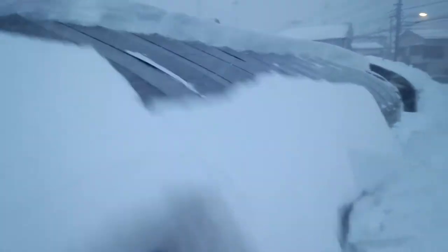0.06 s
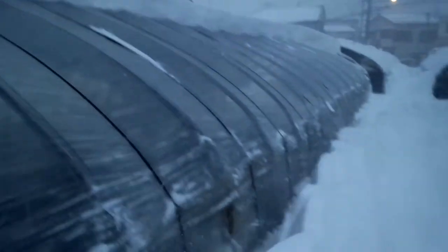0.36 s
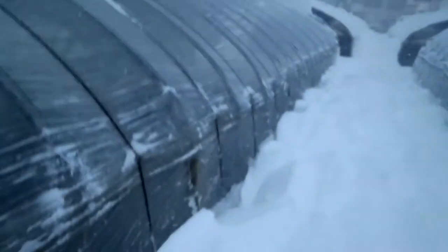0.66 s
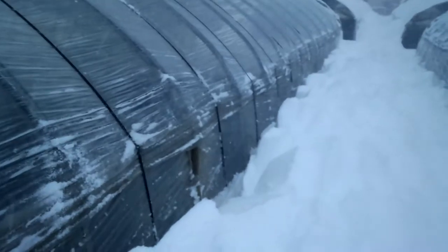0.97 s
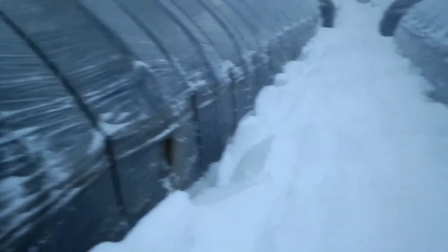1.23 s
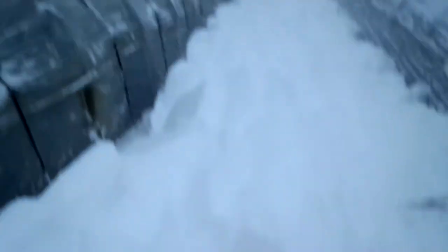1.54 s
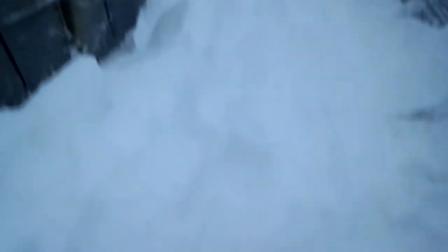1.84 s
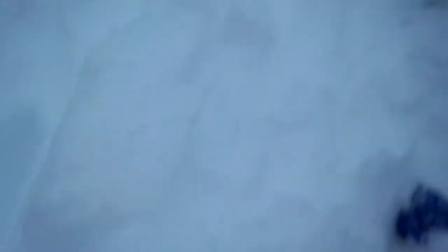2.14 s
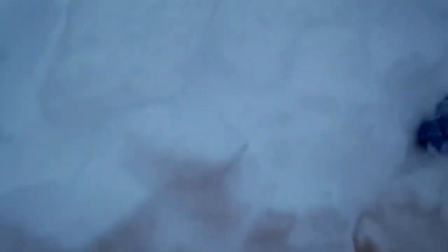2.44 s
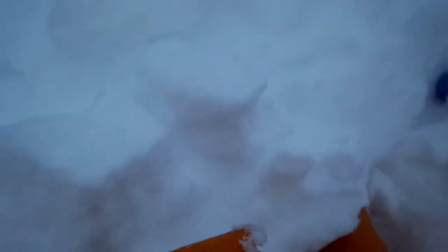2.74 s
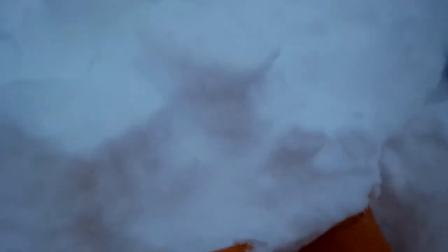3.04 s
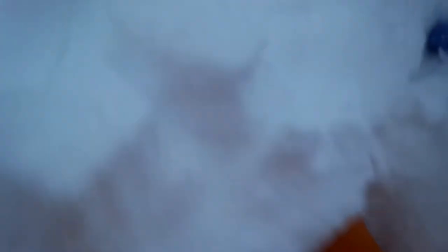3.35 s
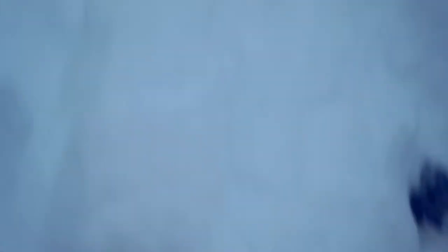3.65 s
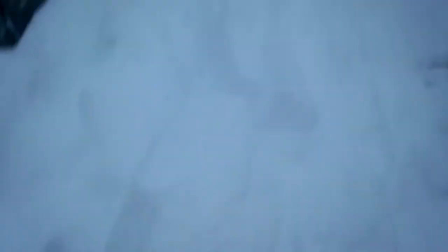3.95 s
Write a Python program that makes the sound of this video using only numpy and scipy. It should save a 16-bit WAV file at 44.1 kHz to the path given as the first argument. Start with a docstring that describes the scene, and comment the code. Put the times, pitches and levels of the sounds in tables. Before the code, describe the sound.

Snow slides off a plastic greenhouse roof right at the start, scraping as lumps tumble, and a powdery hiss fades by about 1 second. Wind thumps on the microphone, strongest from 1.1 to 1.5 seconds and again at 3.5. From 1.5 seconds, nearby snow rustles and crunches faintly, with muffled pats from around 2.5. Cloth swishes twice, at about 3.3 and 3.7 seconds.

```python
"""Snow sliding off a greenhouse

A slab of snow scrapes down a plastic sheet, lumps tumble, and loose powder hisses after it.
Gusts of wind thump on the microphone. Close by, snow rustles and crunches faintly, and cloth,
like a jacket, swishes twice. Sliding and rubbing snow is made of many tiny impacts,
crunches and pats are short knocks, and wind and cloth are shaped noise."""
import sys
import numpy as np
from scipy import signal
from scipy.fft import rfft, irfft, next_fast_len
from scipy.io import wavfile
from scipy.ndimage import uniform_filter1d, map_coordinates

SR = 44100
rng = np.random.default_rng(int(sys.argv[2]) if len(sys.argv) > 2 else 0)


def transcribe(u):
    """Save the signal u as a 16-bit wav file named by the first command-line argument.

    u: samples, shape (n,) or (channels, n), limited to [-1, 1]; the rate is SR.
    q: integer samples, one column per channel.
    """
    v = np.clip(np.atleast_2d(u).T, -1, 1)
    q = np.round(v * 32767).astype(np.int16)
    wavfile.write(sys.argv[1], SR, q)


N = 176400
T = np.arange(N) / SR

# A colour says how strong a sound is at each pitch. Its levels only count against each other.
# colour of the faint background hiss: pitch_hz, level_db
AIR_COLOUR = [(59, -39), (100, -8), (206, -14), (243, -5), (281, -21), (545, -13), (617, -21), (791, -52),
              (914, -43), (1630, -33), (2320, -46), (4310, -30), (7690, -31.5), (10900, -23), (14000, -34)]

# how the wind rises and falls: time_s, level_db
GUSTS = [(0.0, -36.5), (0.07, -38.5), (0.17, -37.5), (0.22, -36.5), (0.3, -25.5), (0.33, -38.5),
         (0.39, -34.5), (0.45, -32.5), (0.55, -46), (0.61, -47), (0.64, -53.5), (0.96, -41.5), (1.0, -47),
         (1.06, -35.5), (1.11, -41), (1.145, -28.5), (1.167, -23.5), (1.186, -37), (1.225, -21),
         (1.248, -29), (1.272, -24), (1.3, -25.5), (1.34, -35.5), (1.44, -44.5), (1.51, -24.5),
         (1.54, -34.5), (1.63, -46), (1.7, -51), (1.75, -37.5), (1.81, -30.5), (1.84, -39.5), (1.93, -50),
         (1.96, -33.5), (2.0, -41), (2.04, -45), (2.13, -40), (2.17, -53.5), (2.36, -52), (2.39, -42.5),
         (2.43, -55), (2.57, -52.5), (2.61, -42.5), (2.69, -53.5), (2.77, -41.5), (2.87, -51.5),
         (2.94, -35.5), (2.98, -44), (3.05, -43.5), (3.09, -50), (3.13, -43), (3.24, -49), (3.43, -48.5),
         (3.47, -37), (3.512, -25), (3.54, -39), (3.57, -46), (3.61, -35.5), (3.67, -59), (3.73, -44.5),
         (3.93, -60), (3.96, -48)]
# colours of the wind's deep swirls and quicker flutter: pitch_hz, level_db
SWIRL_COLOUR = [(12, 1.5), (25, 0), (45, 3), (80, -1.5), (120, -9), (200, -32.5), (320, -50), (600, -53),
                (1500, -97)]
FLUTTER_COLOUR = [(40, -15), (100, 4), (160, 3.5), (240, -6), (320, -16.5), (450, -20), (900, -52),
                  (2500, -78)]

# how the middle and high parts of the rustle rise and fall: time_s, level_db
RUSTLE_MID = [(.9, -62.5), (1.15, -56), (1.65, -56), (1.8, -51.5), (2.05, -52), (2.15, -52.5),
              (2.45, -55.5), (2.58, -58.5), (2.72, -53), (2.86, -49.5), (2.98, -51), (3.09, -54),
              (3.15, -49.5), (3.26, -50), (3.36, -45), (3.62, -48), (3.72, -45), (3.85, -49.5), (4, -51)]
RUSTLE_HIGH = [(.9, -56), (1.15, -54), (1.35, -51.5), (1.65, -52.5), (1.95, -49), (2.3, -51), (2.48, -52.5),
               (2.6, -55), (2.85, -53.5), (3.08, -53), (3.25, -50), (3.42, -49.5), (3.5, -45),
               (3.62, -49.5), (3.85, -51), (4, -49.5)]
# colours of those two parts: pitch_hz, level_db
RUSTLE_MID_COLOUR = [(120, -27), (200, -2.5), (384, -1), (546, -3), (638, -4.5), (1510, -2.5), (1800, -2.5),
                     (2300, -14.5), (2800, -20.5), (3640, -45), (6160, -120)]
RUSTLE_HIGH_COLOUR = [(1530, -43), (2600, -17), (2930, -11), (3600, -3.5), (4140, -1.5), (5410, -0.5),
                      (6640, -12), (7430, -11.5), (9770, -18), (12800, -13), (14000, -22)]
# soft scrapes through snow: start_s, rise_s, hold_s, fall_s, level_db
SCRAPES = [(1.16, 0.068, 0.03, 0.32, -52), (2.74, 0.12, .04, 0.078, -52)]
# muffled pats of snow: start_s, peak_db
PATS = [(2.561, -38.5), (2.789, -35), (2.941, -38), (3.124, -34.5), (3.157, -29.5), (3.172, -30.5),
        (3.487, -34), (3.534, -31), (3.602, -35)]
# colours of the scrapes and pats: pitch_hz, level_db
SCRAPE_COLOUR = [(600, -16), (1200, -6), (1550, 0.5), (1950, -2.5), (2500, -24), (4000, -33)]
PAT_COLOUR = [(40, -17), (130, 1.5), (280, -2.5), (480, -11), (800, -20), (2000, -64), (5000, -72)]
# breaks in the snow's crust, with each part's peak: start_s, thud_db, crack_db, snap_db, tick_db
CRUNCHES = [(1.506, -76, -62, -37.5, -55), (1.602, -70, -55, -38.5, -48), (1.697, -70, -60, -35, -49),
            (1.837, -62, -56, -36, -43), (1.897, -70, -60, -35.5, -48), (1.918, -70, -57, -38, -42),
            (1.942, -62, -42, -42, -43), (1.963, -57, -42, -39, -36), (1.968, -60, -37.5, -44, -52),
            (1.999, -70, -58, -36, -41), (2.050, -47, -30.5, -34, -45), (2.086, -65, -57, -33, -42),
            (2.141, -52, -36, -43, -50), (2.206, -64, -39, -33.5, -46), (2.214, -70, -48, -37, -48),
            (2.230, -50, -45, -24, -48), (2.239, -55, -49.5, -26.5, -38), (2.253, -44, -34, -47, -55),
            (2.258, -54, -35, -34.5, -49), (2.267, -66, -50, -32, -42), (2.276, -70, -54, -36, -48),
            (2.310, -62, -53, -28, -27.5), (2.317, -63, -33.5, -38, -46), (2.354, -68, -42, -35, -42),
            (2.383, -35.5, -31.5, -33, -31.5), (2.392, -24, -32, -49, -51), (2.424, -69, -46, -37, -50),
            (2.46, -35, -32, -44, -52), (2.492, -38, -51, -39, -62), (2.533, -68, -58, -40, -35),
            (3.015, -31.5, -21, -32, -53), (3.021, -58, -39, -42, -56), (3.0606, -52, -32, -32.5, -48),
            (3.083, -35, -49, -62, -65), (3.103, -70, -58, -36, -36), (3.565, -65, -50, -34, -27),
            (3.589, -70, -60, -44, -38), (3.702, -51, -27.5, -52, -60)]
# colours of the four parts of a crunch, from dull to bright: pitch_hz, level_db
THUD_COLOUR = [(40, -29), (130, 1), (330, 2.5), (700, -5), (1500, -17), (4000, -76)]
CRACK_COLOUR = [(100, -27), (450, -1), (1000, 6), (1850, 4), (2500, -16.5), (6000, -29), (14000, -93)]
SNAP_COLOUR = [(500, -52), (2700, -12), (4000, -2.5), (5700, 9), (6700, -12.5), (14000, -20)]
TICK_COLOUR = [(1500, -37), (5000, -18), (7300, 2.5), (9500, -9), (13500, -3.5), (16000, -14)]

# strokes of cloth: start_s, rise_s, hold_s, fall_s, level_db
SWISHES = [(3.319, 0.019, 0.027, 0.035, -38.5), (3.648, 0.034, 0.078, 0.1, -36.5)]
# colours of a swish and its duller tail: pitch_hz, level_db
SWISH_COLOUR = [(2500, -24), (4100, -12), (4900, -6), (5500, 4), (6000, 0.5), (6800, -11.5), (7400, -9),
                (9200, -19.5), (11000, -18), (14000, -29)]
SWISH_TAIL_COLOUR = [(2600, -30), (3700, -2), (4400, 0), (5400, -4), (6300, -19), (14000, -32)]

# how the powder swells and fades behind the slab: time_s, body_db, hiss_db
POWDER = [(0, -65, -48), (.22, -50.5, -47), (.29, -42, -44), (.36, -41.5, -42), (.45, -44.5, -42.5),
          (.52, -46.5, -47), (.68, -51, -50), (.9, -56.5, -54), (1.2, -67, -65)]
# colours of the powder's low body, its hiss and its finest dust: pitch_hz, level_db
POWDER_BODY_COLOUR = [(180, -31), (300, -3), (526, -5.5), (566, -2.5), (610, -7.5), (1000, -4.5),
                      (1110, -4), (1610, 1), (2800, -18), (3640, -47), (6160, -120)]
POWDER_HISS_COLOUR = [(1530, -55), (2600, -25), (2930, -15), (3570, -3), (4500, 0), (5600, -2), (6590, -13),
                      (11100, -16), (13300, -15.5), (14000, -23)]
DUST_COLOUR = [(3000, -30), (6000, -7), (7500, -1.5), (9200, -1), (11000, 2.5), (14000, -3.5)]
# how the rumble of tumbling lumps swells and fades: time_s, level_db
LUMPS = [(0, -49), (.09, -41), (.15, -38.5), (.22, -45), (.26, -47), (.31, -43), (.42, -55.5), (.55, -81),
         (.8, -88)]
# colour of that rumble: pitch_hz, level_db
LUMP_COLOUR = [(80, -17), (170, 1.5), (270, 1.5), (420, -8.5), (700, -14), (1500, -32.5)]
# how the slab's scrape on the sheet fades: time_s, level_db
SLAB = [(0, -29.5), (.05, -30), (.11, -31), (.165, -34), (.2, -39), (.235, -51)]
# colours of the slab's low body and its hiss: pitch_hz, level_db
SLAB_BODY_COLOUR = [(71, -26), (120, 2.5), (226, -15), (393, -8.5), (657, -13), (720, -7), (1490, -6),
                    (2040, -9), (2800, -42), (3640, -61), (6160, -120)]
SLAB_HISS_COLOUR = [(1530, -27), (2600, -13), (2850, -13.5), (4200, -0.5), (5560, -5), (6730, -16),
                    (8920, -21), (12800, -21.5), (14000, -25)]


def amp(db):
    """Turn decibels into a number to multiply a sound by."""
    return 10 ** (np.asarray(db) / 20)


def unit(x):
    """Scale a sound so its average strength (rms) is 1."""
    return x / np.sqrt(np.mean(x ** 2) + 1e-20)


def gain_at(colour, hz):
    """How strong a colour is at the given pitches."""
    pitch_hz, level_db = np.transpose(colour)
    return amp(np.interp(np.log(hz + 1), np.log(pitch_hz + 1), level_db))


def curve(rows):
    """Join (time, value) points with straight lines, one value per sample."""
    return np.interp(T, *np.transpose(rows))


def wobble(per_s):
    """A smooth curve through per_s random values each second."""
    return map_coordinates(rng.standard_normal(int(N * per_s / SR) + 4), [T * per_s])


def filtered(x, response):
    """Turn each pitch in a sound up or down by response(hz)."""
    size = next_fast_len(N + SR // 2)
    return irfft(rfft(x, size) * response(np.fft.rfftfreq(size, 1 / SR)), size)[:N]


def coloured(x, colour):
    """Give a sound a colour, at strength 1."""
    return unit(filtered(x, lambda hz: gain_at(colour, hz)))


def noise(colour):
    """Smooth noise with a colour."""
    return coloured(rng.standard_normal(N), colour)


def grains(colour, per_s, spread_db, smooth_db):
    """Tiny random impacts mixed with smooth noise; spread_db makes their sizes uneven."""
    sizes = rng.choice([-1, 1], N) * amp(spread_db * np.minimum(rng.exponential(size=N), 4))
    hits = unit(sizes * (rng.random(N) < per_s / SR))
    return coloured(hits + amp(smooth_db) * rng.standard_normal(N), colour)


def ring(colour, size=2048):
    """The short sound that one sharp tap with this colour makes."""
    cepstrum = irfft(np.log(gain_at(colour, np.fft.rfftfreq(size, 1 / SR))))
    # fold the second half onto the first, so nothing sounds before the tap
    cepstrum[1:size // 2] *= 2
    cepstrum[size // 2 + 1:] = 0
    return irfft(np.exp(rfft(cepstrum)))


def strokes(rows):
    """The strength of rubbing strokes over time: each rises, holds and falls."""
    return sum(amp(db) * np.interp(T, s + np.cumsum([0, rise, hold, fall]), [0, 1, 1, 0]) ** 1.28
               for s, rise, hold, fall, db in rows)


def air(level_db=-61.5):
    """A faint, steady hiss in the background."""
    return amp(level_db) * noise(AIR_COLOUR)


def wind(swirl_db=1.95, flutter_db=-11):
    """Gusts thump on the microphone: deep swirls of air with a quicker flutter on top."""
    gust_db = curve(GUSTS)
    swirls = noise(SWIRL_COLOUR)
    power = np.abs(uniform_filter1d(swirls ** 2, size=1300))
    even_swirls = unit(swirls / np.sqrt(power + 0.037))  # so the gusts set the loudness
    flutter = amp(gust_db + flutter_db + 2.7 * wobble(45)) * noise(FLUTTER_COLOUR)
    return amp(gust_db + swirl_db) * even_swirls + flutter


def rustle():
    """Snow rubs softly close by, with a fine crackle on top."""
    fade_in = np.clip((T - .7) / 0.28, 0, 1)
    rub = amp(curve(RUSTLE_MID) + 0.8 + 0.67 * wobble(29.68))
    rub *= grains(RUSTLE_MID_COLOUR, per_s=900, spread_db=4, smooth_db=3)
    crackle = amp(curve(RUSTLE_HIGH) - 1.05 + 0.94 * wobble(34.86))
    crackle *= grains(RUSTLE_HIGH_COLOUR, per_s=1000, spread_db=4, smooth_db=1)
    return fade_in * (rub + crackle)


def scrapes():
    """Soft, grainy rubs through snow."""
    return strokes(SCRAPES) * grains(SCRAPE_COLOUR, per_s=800, spread_db=0, smooth_db=-3)


def pats():
    """Soft snow packs down in muffled pats."""
    force, response = np.zeros(N), ring(PAT_COLOUR)
    for start_s, peak_db in PATS:
        force[round(start_s * SR)] = amp(peak_db)
    return signal.fftconvolve(force, response / np.abs(response).max())[:N]


def crunches(crumble_s=0.0023, crumble_strength=0.094):
    """The snow's crust breaks: a sharp knock, then a brief crumble, dull or bright."""
    out, t = np.zeros(N + SR), np.arange(1024) / SR
    rings = [ring(colour) for colour in (THUD_COLOUR, CRACK_COLOUR, SNAP_COLOUR, TICK_COLOUR)]
    for start_s, *peaks_db in CRUNCHES:
        for peak_db, response in zip(peaks_db, rings):
            force = crumble_strength * rng.standard_normal(len(t)) * np.exp(-t / crumble_s)
            force[0] = 1  # the knock
            hit = signal.fftconvolve(force, response)
            out[round(start_s * SR):][:len(hit)] += amp(peak_db) * hit / np.abs(hit).max()
    return out[:N]


def swishes(tail_delay_s=0.043, tail_db=-12):
    """Smooth cloth brushes past in two strokes; each gets duller as it slows."""
    strength = strokes(SWISHES)
    tail = amp(tail_db) * np.interp(T - tail_delay_s, T, strength) * noise(SWISH_TAIL_COLOUR)
    return strength * amp(0.99 * wobble(53)) * noise(SWISH_COLOUR) + tail


def powder(dust_db=-57, dust_peak_s=0.7, dust_width_s=0.33):
    """Loose snow runs down behind the slab; the finest dust comes last."""
    time_s, body_db, hiss_db = np.transpose(POWDER)
    body = amp(np.interp(T, time_s, body_db) + 0.6 * wobble(37.6))
    body *= grains(POWDER_BODY_COLOUR, per_s=4400, spread_db=2, smooth_db=-0.5)
    hiss = amp(np.interp(T, time_s, hiss_db) + 1.2 * wobble(60.3))
    hiss *= grains(POWDER_HISS_COLOUR, per_s=5000, spread_db=3.5, smooth_db=5.5)
    dust = amp(dust_db) * np.exp(-((T - dust_peak_s) / dust_width_s) ** 2) * noise(DUST_COLOUR)
    return body + hiss + dust


def lumps():
    """Lumps tumble and rumble as the slab breaks over the edge."""
    return amp(curve(LUMPS)) * grains(LUMP_COLOUR, per_s=320, spread_db=2, smooth_db=-4.5)


def slab(fade_db_per_s=79, dulling_db_per_s=61):
    """Snow crystals scrape on the plastic; the sound gets duller as the slab leaves the roof."""
    end_s = SLAB[-1][0]
    level_db = curve(SLAB) - fade_db_per_s * np.maximum(T - end_s, 0)
    body = amp(-1.5 + 0.9 * wobble(89))
    body *= grains(SLAB_BODY_COLOUR, per_s=2500, spread_db=2.5, smooth_db=1)
    hiss = amp(-1 + 0.87 * wobble(95) - dulling_db_per_s * T)
    hiss *= grains(SLAB_HISS_COLOUR, per_s=4000, spread_db=-1.5, smooth_db=-4)
    return amp(level_db) * (body + hiss)


def scene():
    """Add all the sounds into one channel; the snow leaves no echo."""
    background = air()
    slide = slab() + lumps() + powder()
    nearby = rustle() + scrapes() + crunches() + pats() + swishes()
    return (background + wind() + nearby + slide)[None]


def record(dry, top_hz=14000, offset=-0.0538):
    """Cut the highest pitches and shift the whole wave slightly below zero."""
    return filtered(dry[0], lambda hz: hz < top_hz)[None] + offset


dry = scene()
out = record(dry)
transcribe(out)
```